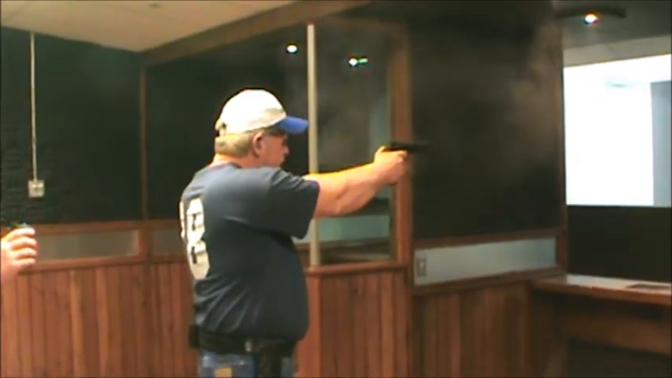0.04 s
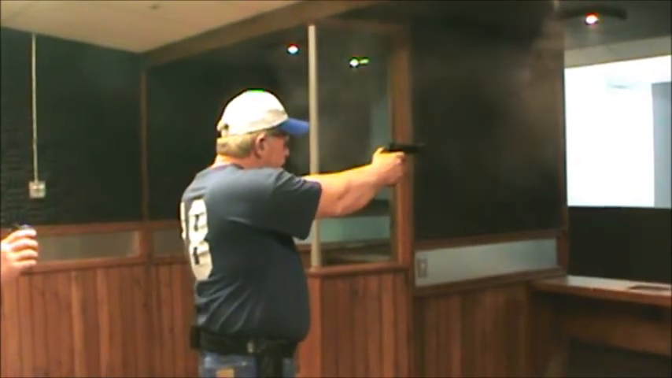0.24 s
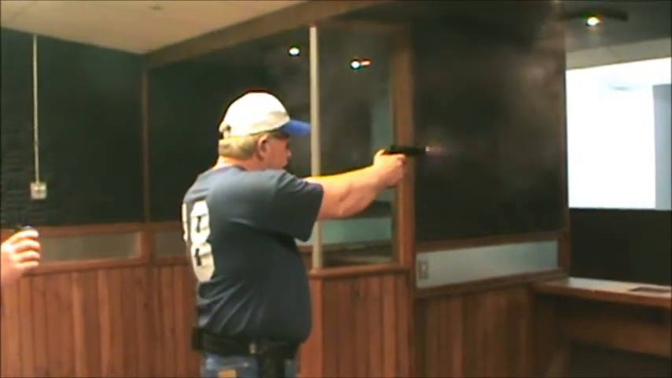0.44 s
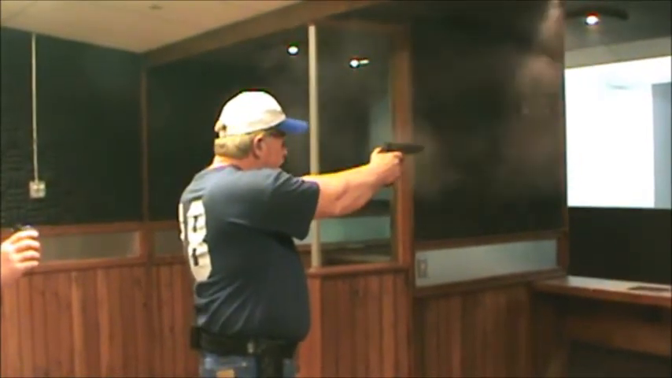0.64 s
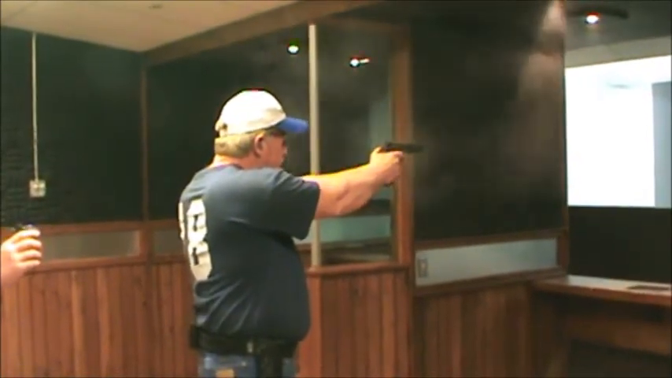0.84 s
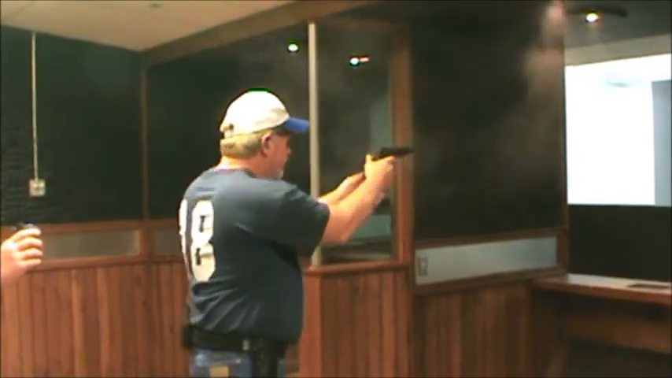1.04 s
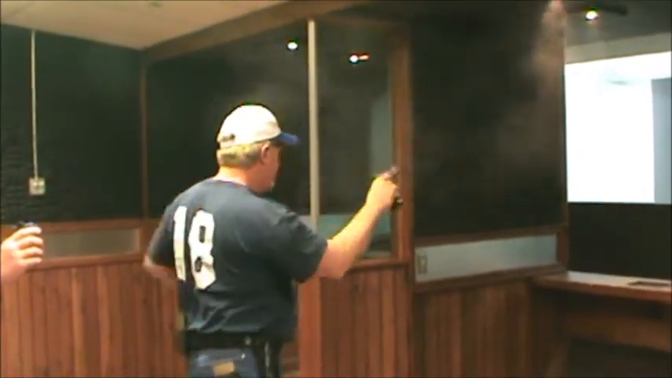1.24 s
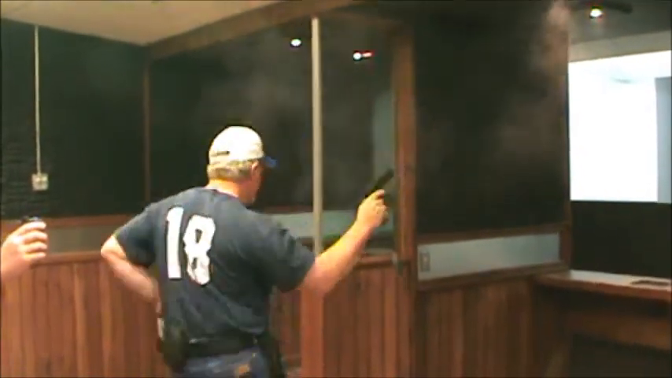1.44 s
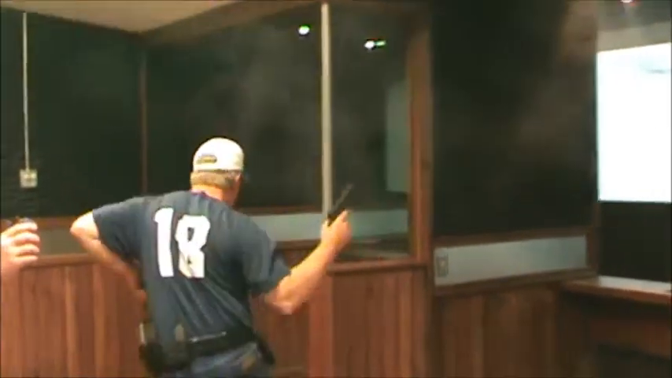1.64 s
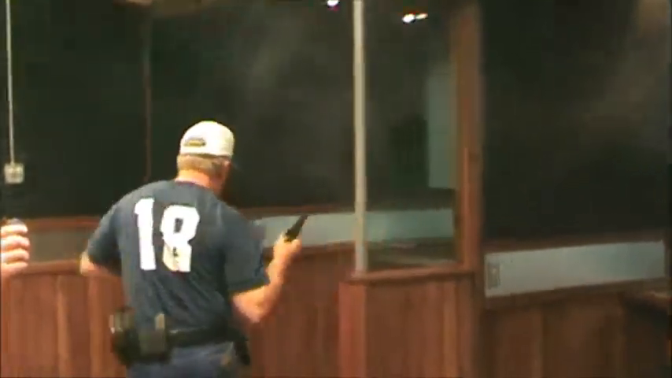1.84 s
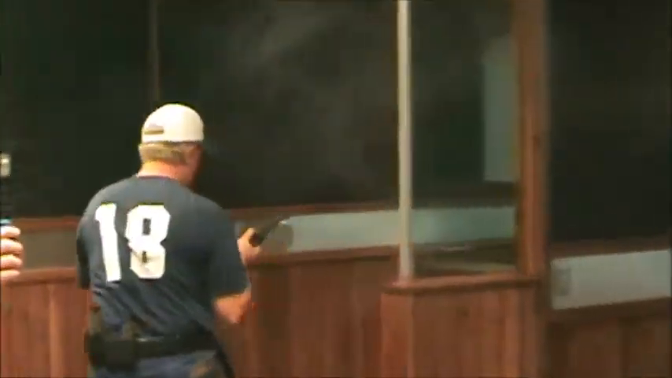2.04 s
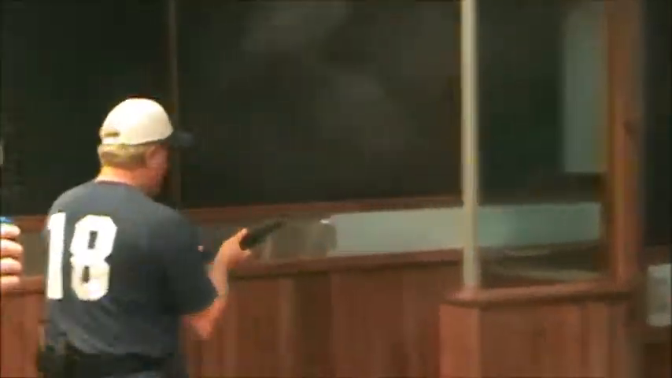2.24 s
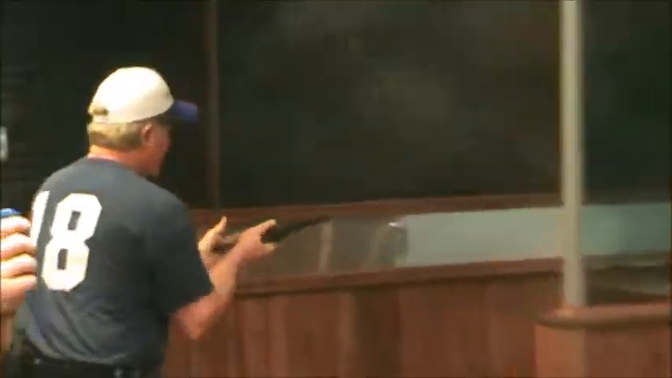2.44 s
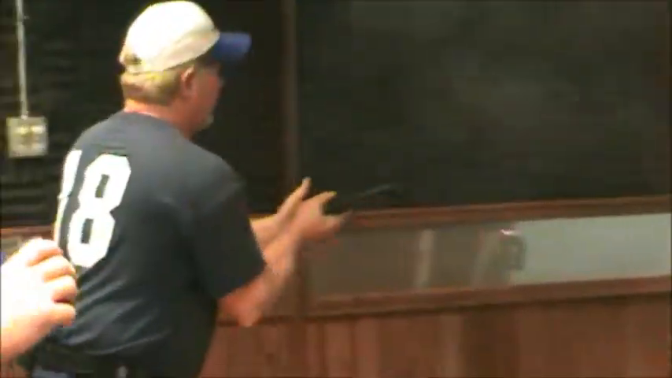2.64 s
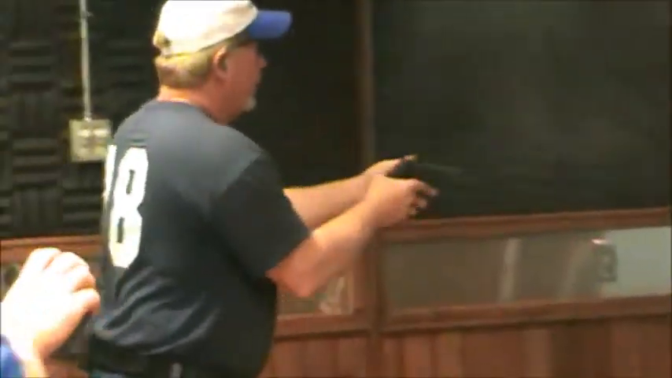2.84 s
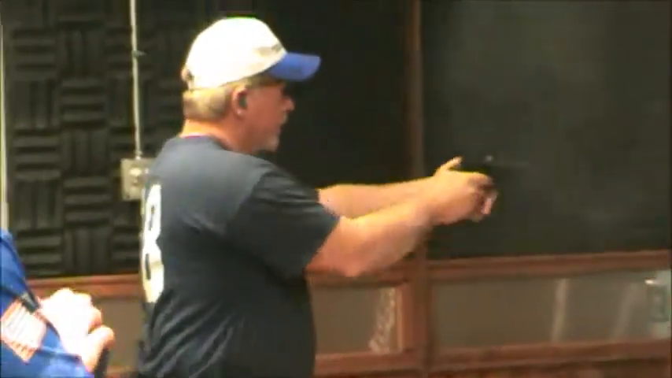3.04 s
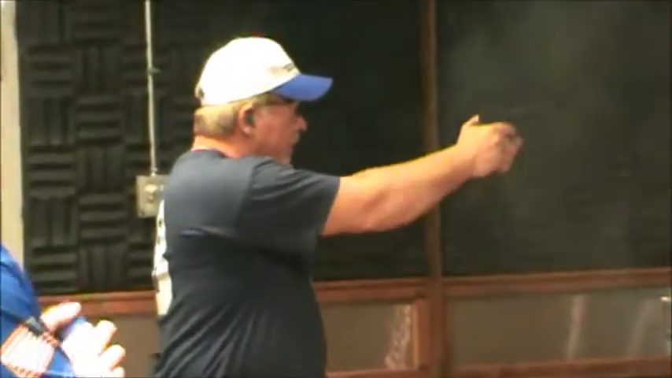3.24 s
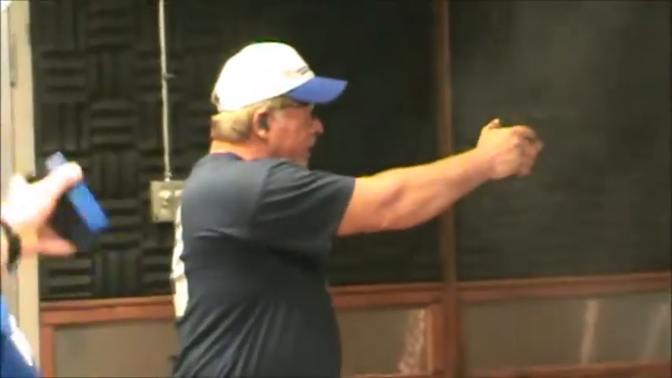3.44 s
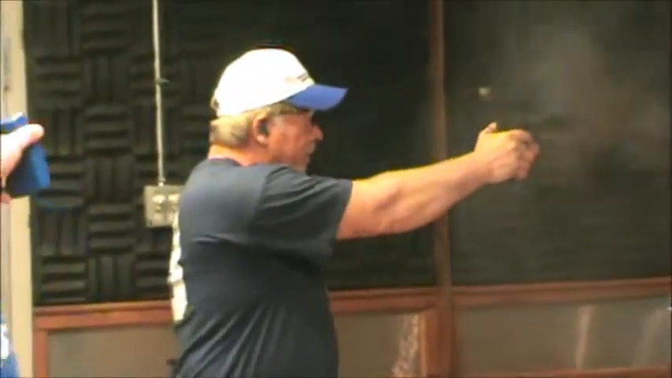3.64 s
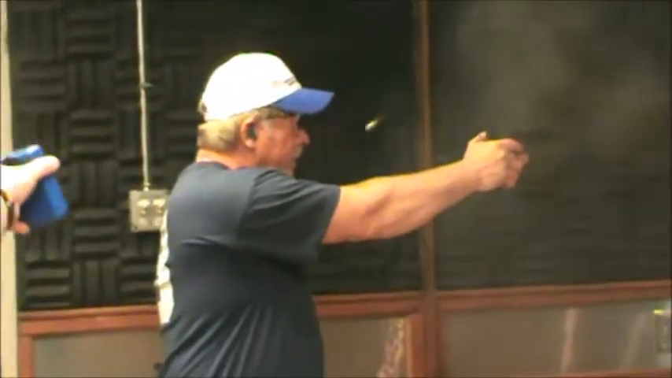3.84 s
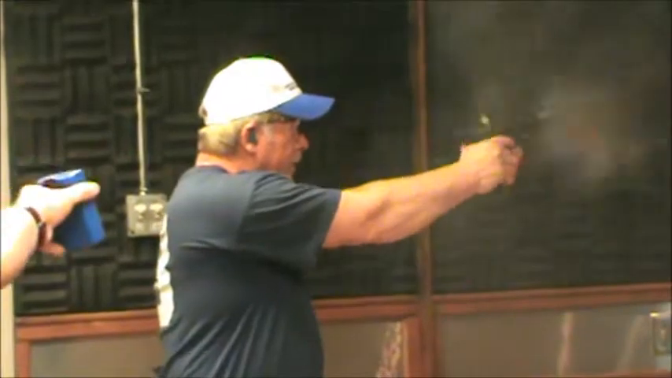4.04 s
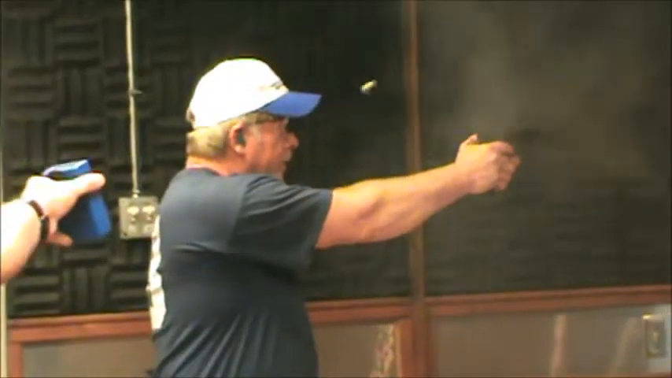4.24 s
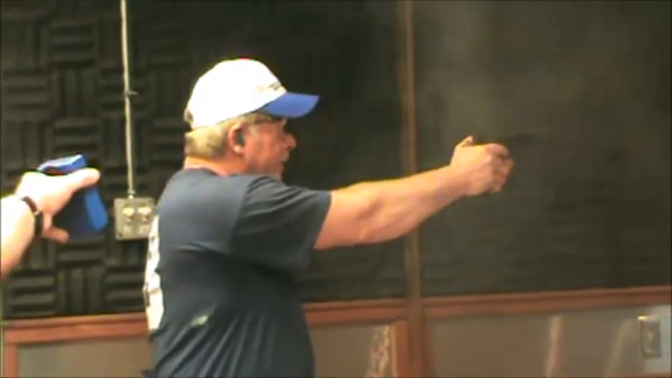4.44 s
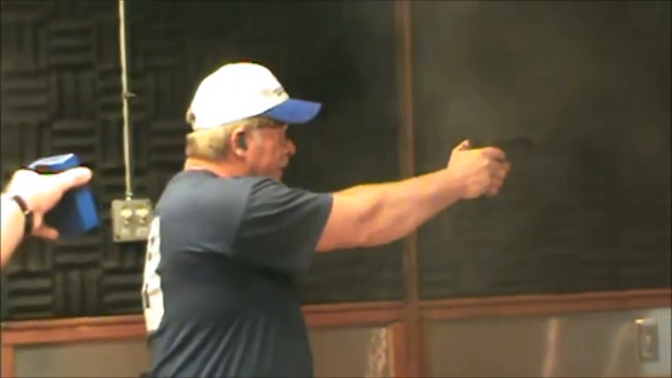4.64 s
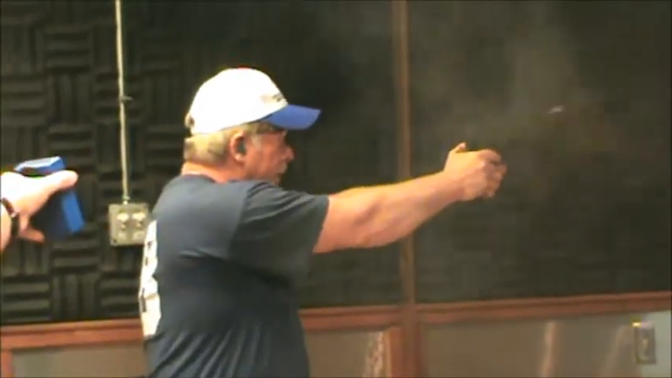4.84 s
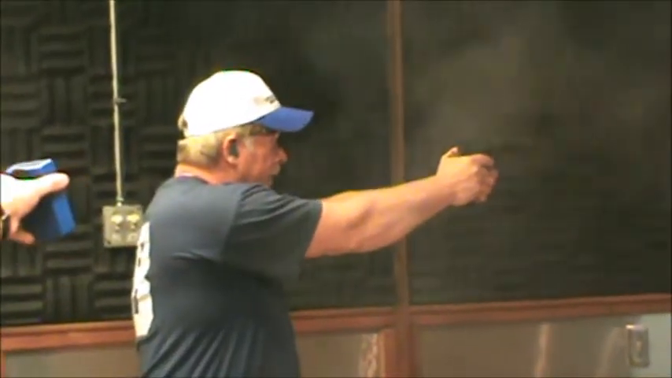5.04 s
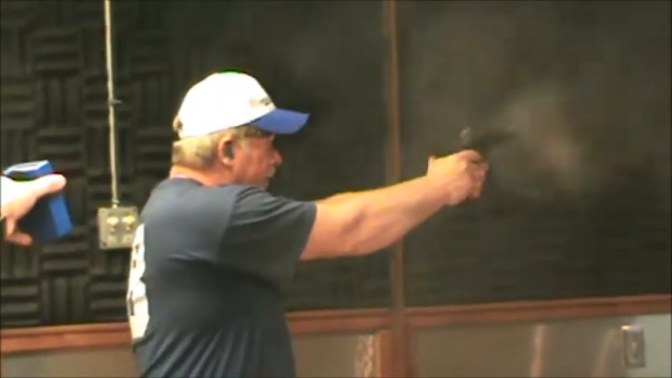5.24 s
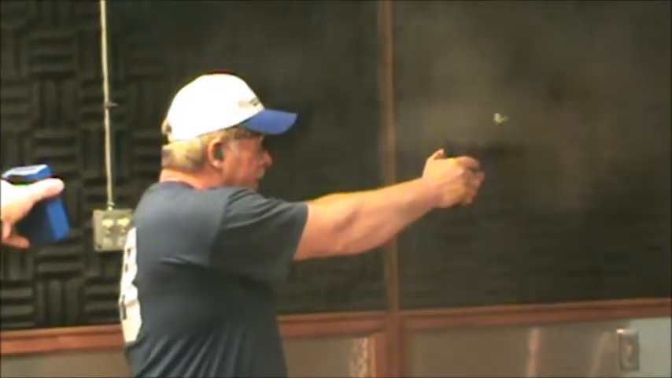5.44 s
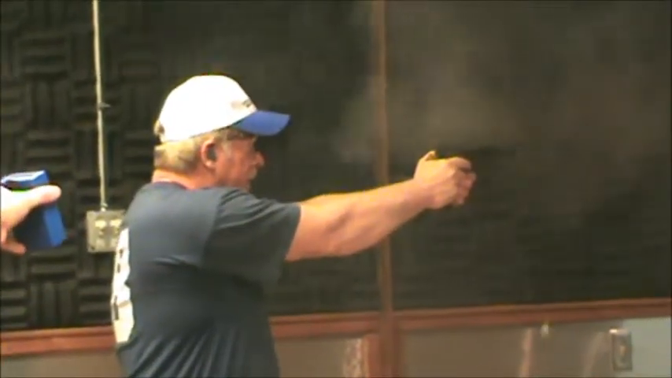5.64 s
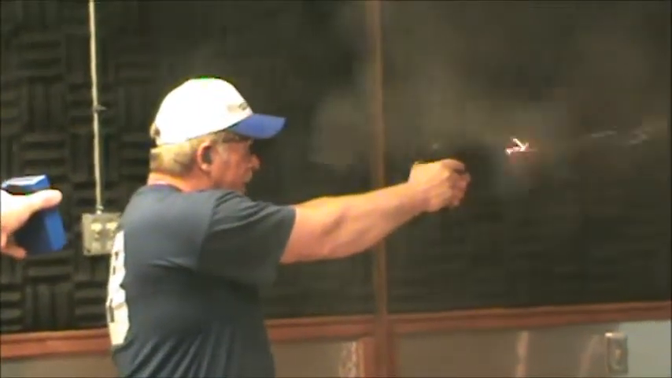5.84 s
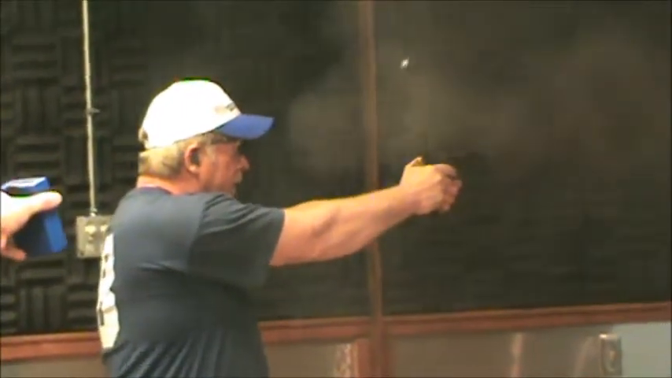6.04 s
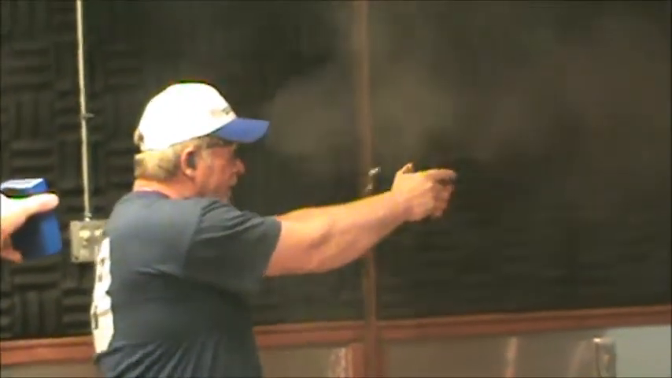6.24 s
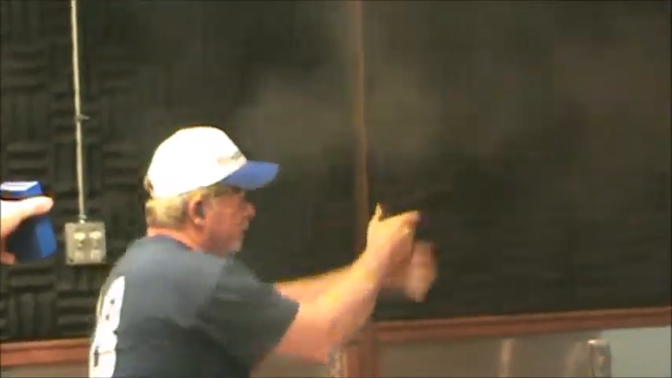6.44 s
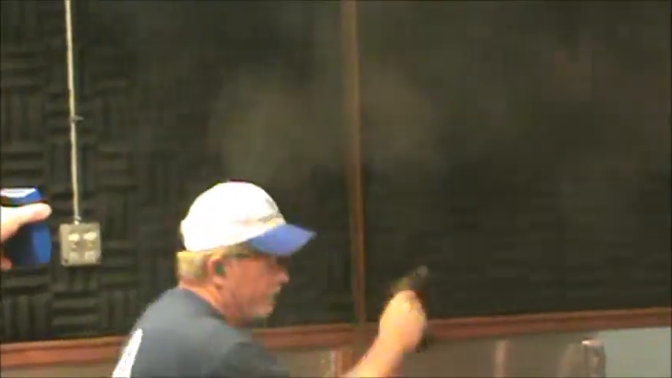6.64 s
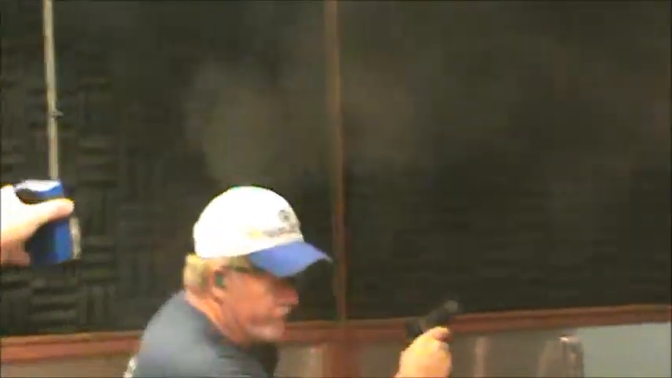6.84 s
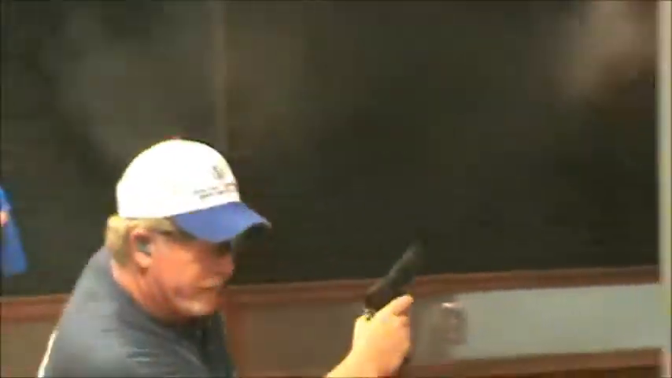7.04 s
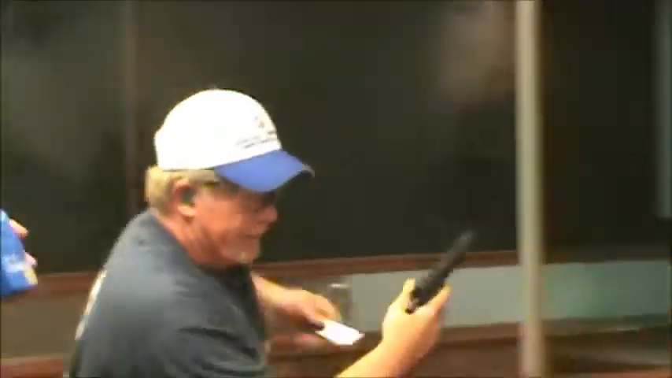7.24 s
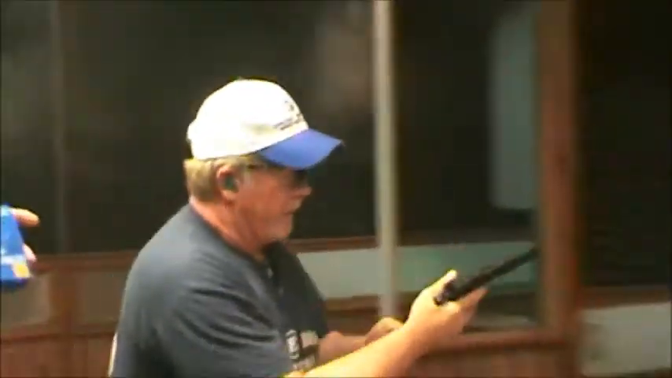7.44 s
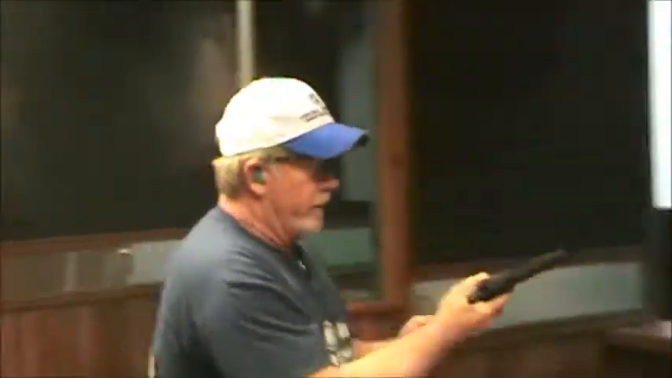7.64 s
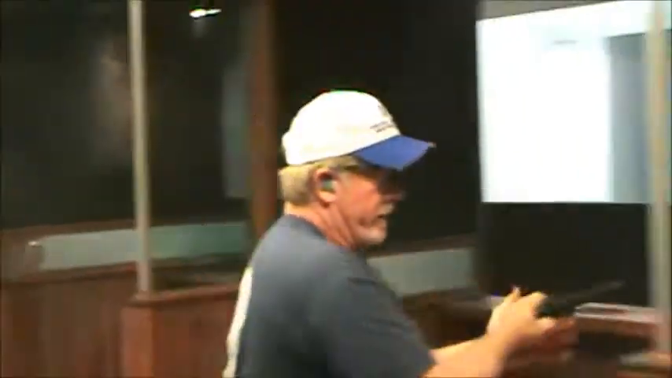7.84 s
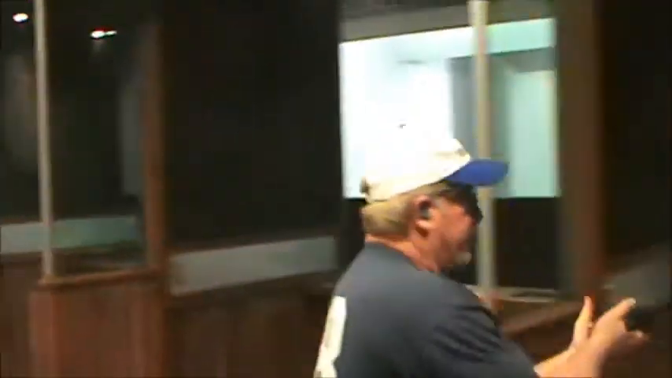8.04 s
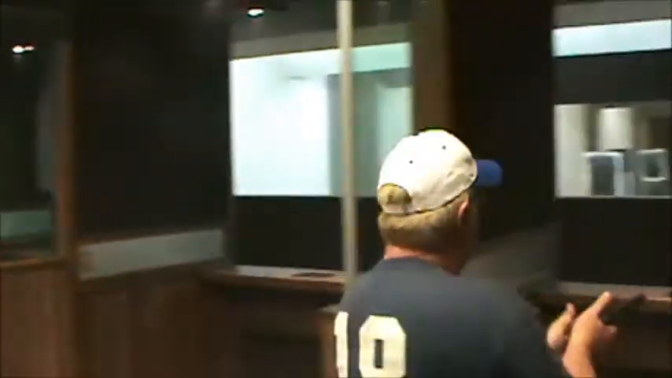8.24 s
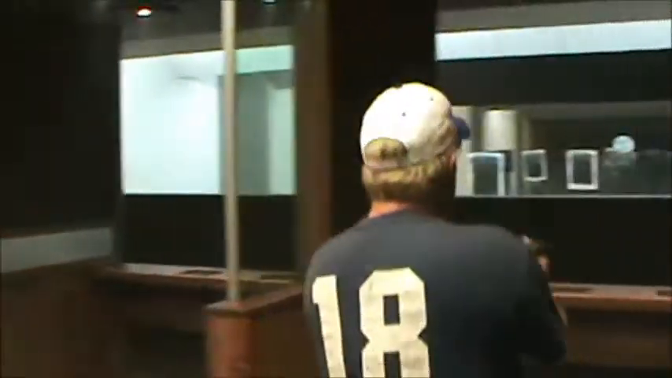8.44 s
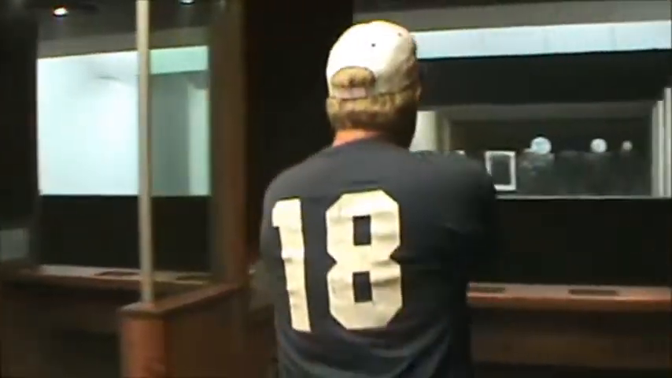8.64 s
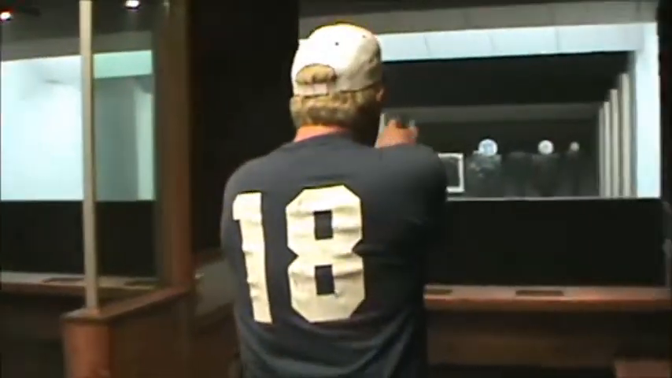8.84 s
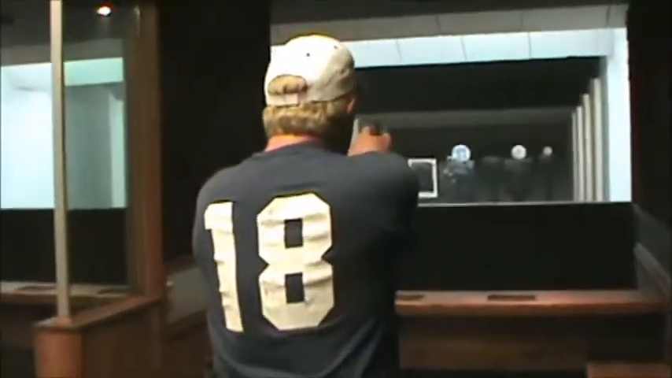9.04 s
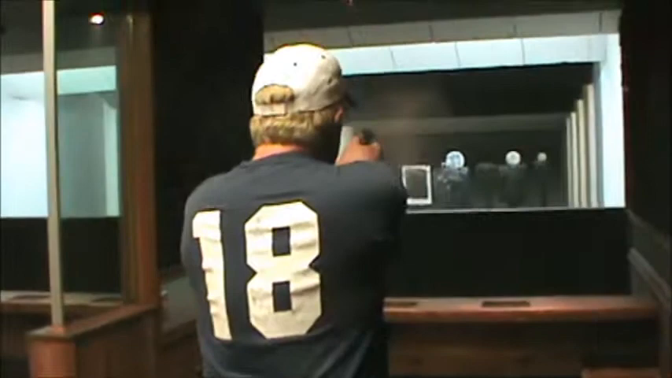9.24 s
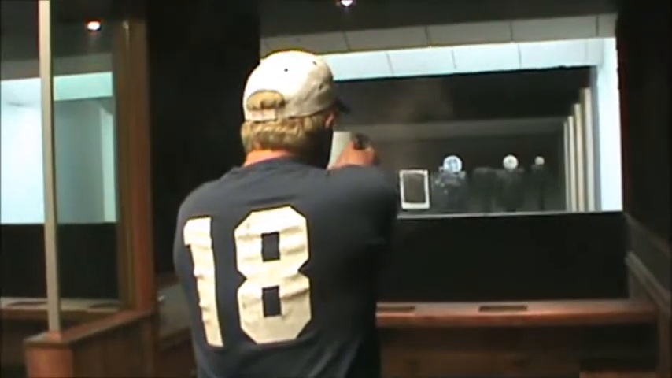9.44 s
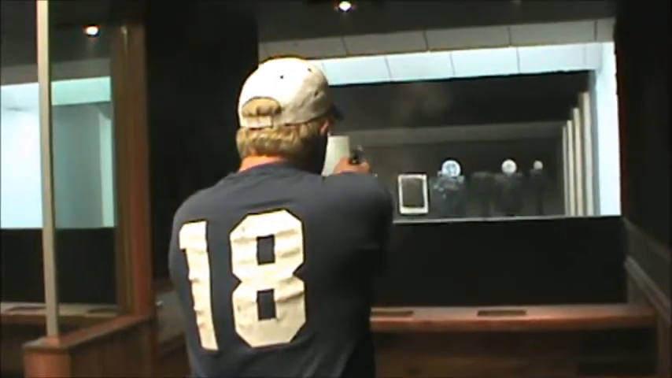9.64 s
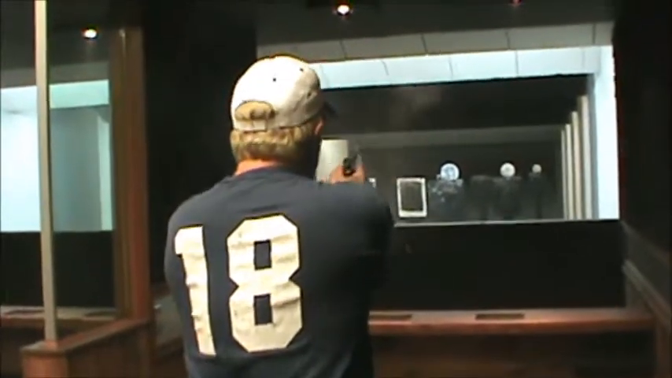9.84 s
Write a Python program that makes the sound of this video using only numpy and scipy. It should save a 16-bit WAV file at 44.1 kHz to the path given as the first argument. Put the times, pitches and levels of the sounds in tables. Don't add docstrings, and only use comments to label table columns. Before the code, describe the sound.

Loud handgun blasts at about 0.5, 3.6 to 5.9 and 9.1 seconds, ringing steel targets, tinkling brass and sharp reload clatter over ventilation rumble.

```python
import sys
import numpy as np
from scipy import signal
from scipy.fft import rfft, irfft, next_fast_len
from scipy.io import wavfile
from scipy.ndimage import uniform_filter1d, map_coordinates

SR = 44100
rng = np.random.default_rng(int(sys.argv[2]) if len(sys.argv) > 2 else 0)


def store_pcm(level_fs):
    pcm = np.round(np.clip(level_fs, -1, 1) * 32767).astype(np.int16)
    wavfile.write(sys.argv[1], SR, np.atleast_2d(pcm).T)


def rack_gain(trim_db):
    fader = np.asarray(trim_db, float)
    return 10 ** (fader / 20)


N = 436570

# start_s, far_end_delay_s, answer_db, answer_brightness_db, near_hall_db
SHOTS = [
    (-.2, 0.11, -29, 4.5, -46),
    (0.4715, 0.16, -20.5, 4, -15.5),
    (3.601, 0.16, -18.5, 5, -15),
    (4.048, .16, -18.5, 0.5, -15.5),
    (4.774, 0.13, -18, 6.5, -19.5),
    (5.2413, .124, -19.5, 4.5, -19),
    (5.8664, 0.15, -21, 1, -16.5),
    (9.085, 0.18, -15, 1.5, -14.5),
]
# frequency_hz, density_db_per_hz
ANSWER = [(35, -47), (60, -24), (262, -6.5), (301, -5), (400, -5.5), (520, -3), (698, -6.5), (924, -3.5),
          (3040, -5.5), (12100, -21), (14600, -34.5), (16000, -35)]
# frequency_hz, density_db_per_hz
BOOM = [(60, -28), (150, -10), (300, -6.5), (400, -7), (550, -2), (850, -6), (1500, -23), (4000, -69)]
# frequency_hz, t60_s
BAY = [(100, 0.49), (500, 0.39), (1500, 0.24), (5000, 0.24), (14000, 0.19)]
# frequency_hz, t60_s
HALL = [(100, 1.37), (500, 1.216), (2500, 1.45), (6000, 1.124), (14000, 0.71)]


def along(points, hz):
    f, v = np.transpose(points)
    return np.interp(np.log(hz + 1), np.log(f + 1), v)


def tone(points):
    return lambda f: rack_gain(along(points, f))


def room_decay(points, factor=1):
    return lambda f: factor * along(points, f)


def even_decay(t60):
    return lambda f: t60 + 0 * f


def balance(left_over_right_db):
    return rack_gain(left_over_right_db / 2 * np.array([[1], [-1]]))


def add(out, s, x):
    at = round(s * SR)
    x = x[:, max(-at, 0):N - at]
    out[:, max(at, 0):][:, :x.shape[1]] += x


def wobble(rate, size, channels=2):
    knots = rng.standard_normal((channels, int(size * rate / SR) + 4))
    coarse = np.arange(0, size + 128, 128)
    curves = [map_coordinates(k, [coarse * rate / SR]) for k in knots]
    return np.array([np.interp(np.arange(size), coarse, curve) for curve in curves])


def burst(colour, t60, size, rise, width=1, patchy_db=0):
    # frequency_hz, likeness_0_to_1
    likeness = [(60, 0.6), (180, 0.7), (550, 0.73), (1650, 0.65), (4970, 0.32), (15000, 0.57)]
    hz, t, z = signal.stft(rng.standard_normal((2, size)), SR, nperseg=256)
    if patchy_db:
        field = rng.standard_normal(z.shape[1:])
        field = uniform_filter1d(uniform_filter1d(field, size=2, axis=0), size=24, axis=1)
        z = z * rack_gain(patchy_db * field / field.std())
    z = z * rack_gain(-60 * t / t60(hz)[:, None])
    dying = signal.istft(z, SR, nperseg=256)[1][:, :size]

    hz = np.fft.rfftfreq(size, 1 / SR)
    turn = np.arccos(np.clip(along(likeness, hz), -1, 1)) / 2 * width
    gain = colour(hz) / np.sqrt(np.mean(colour(hz) ** 2))
    mid, side = irfft(rfft(dying) * (gain * [np.cos(turn), np.sin(turn)]), size)
    onset = 1 - np.exp(-np.arange(size) / SR / rise)
    close = np.clip(np.arange(size)[::-1] / 4096 - 1, 0, 1)
    return np.array([mid + side, mid - side]) * (onset * close)


def ring(hz, t60, swell, beat, steady, size):
    t = np.arange(size) / SR
    hall, own = wobble(beat, size), wobble(beat, size, channels=4)
    shared_swing = .55 * (hall[0] + 1j * hall[1])
    own_swing = .55 * (own[:2] + 1j * own[2:])
    wander = steady + np.sqrt(np.clip(1 - steady ** 2, 0, 1)) * (shared_swing + own_swing)
    wander = wander / (np.abs(wander) + .05) ** .25
    carrier = np.real(wander * np.exp(2j * np.pi * hz * t))
    return 0.89 * carrier * rack_gain(-60 * t / t60) * (1 - np.exp(-t / swell))


def shots():
    # frequency_hz, density_db_per_hz
    blast = [(35, -45), (60, -19.5), (566, -4), (749, -6), (1170, -5), (1950, -6), (2300, -11.5),
             (2900, -6.5), (3850, -12), (11000, -14), (16000, -22.5)]
    bass_back = [0, 0.5, 2.5, 6.5, -0.5, -1, 2.5, -1.5]
    patchy_db = 2.2
    out = np.zeros((2, N))
    for (s, delay, answer_db, bright_db, near_db), bass_db in zip(SHOTS, bass_back):
        add(out, s, rack_gain(1.0) * burst(tone(blast), room_decay(BAY), SR, rise=0.0008))

        boom_db = 1.5 + 0.46 * near_db
        boom_t60 = 0.37 - 0.0177 * bright_db
        if s > 8.5:
            boom_db, boom_t60 = boom_db + 1.5, boom_t60 * 1.28
        add(out, s, rack_gain(boom_db) * burst(tone(BOOM), even_decay(boom_t60), SR, rise=0.031))

        lingering = room_decay(HALL, 0.82 + 0.0623 * bright_db)
        near = burst(tone(blast), lingering, SR * 3 // 2, rise=0.023, patchy_db=patchy_db)
        add(out, s, rack_gain(near_db) * near)

        tilt = tone([(800, bass_db), (2000, 0), (10000, bright_db)])
        colour = lambda f: tone(ANSWER)(f) * tilt(f)
        answer = burst(colour, lingering, SR * 3 // 2, rise=0.0072, patchy_db=patchy_db)
        add(out, s + delay, rack_gain(answer_db) * answer)
    return out


def plates():
    # start_s, level_db, swell_s, overtones_db, lead_of_strong_modes_ratio
    strikes = [
        (-.08, 3.5, 0.058, 3.5, 1.1),
        (0.631, 2.5, 0.05, 2, 1.35),
        (3.659, 7.5, 0.018, 0.5, 0.85),
        (4.09, -7.5, 0.0083, 10.5, 0.54),
        (4.91, 14.5, 0.18, -1, 0.74),
        (5.366, 5, 0.04, 0, 1.22),
        (5.935, -0.5, 0.006, 5.5, 1),
    ]
    # pitch_spread_share, steady_part_0_to_1, left_over_right_db
    swings = [(.012, .6, -3), (.012, .6, -5), (.003, .85, 0), (.017, .3, -1), (.005, .6, 0), (.012, .5, -3),
              (.013, .5, -8)]
    lives = [0.99, .85, 0.89, 0.93, .65, .9, 1.08]
    # pitch_hz, level_db, t60_s
    plate_a = [(1582, -42, 2.06), (2467, -27, 1.36), (2479, -23, 1.36), (2954, -33, 1.48),
               (3076, -35, 1.61), (4570, -45, 2.19), (4944, -41, 1.45), (8087, -36, 1.1), (9026, -56, 2.4)]
    # pitch_hz, level_db, t60_s
    plate_b = [(1596, -31, 1.71), (2303, -24.5, 1.7), (3091, -24, 1.48), (3255, -28, 1.1),
               (4623, -31.5, 1.55), (4979, -34, 1.47), (5160, -35, 1.49), (7224, -36, 1.76),
               (7631, -31, 1.75), (8237, -31, 1.19), (9917, -35, 1.24), (9998, -35, 1.25),
               (10690, -39, 1.37), (13231, -47, 1.51)]
    # pitch_hz, level_db, t60_s, left_over_right_db
    plate_c = [(1703, -30, 2.8, 1), (1800, -34, 2.4, -4), (2041, -27, 2.4, 5), (2450, -35, 2.14, 0),
               (2889, -36, 2.4, -2), (3568, -32, 2.4, -1), (4082, -33, 2.4, -1), (4179, -36, 2.2, 1),
               (4247, -33, 2.12, -1), (4439, -30, 1.78, -4), (5783, -36, 2.4, 4), (6529, -37, 1.96, -5),
               (8508, -43, 1.02, 0), (8759, -42, .98, 0),
               (2773, -38, 2.4, -12), (5283, -40, 2.4, 4), (5708, -41, 2.4, 10), (6006, -40, 2.4, 9),
            (7516, -40, 1.62, -4), (7835, -44, 1.54, 6), (8280, -44, 1.11, -6), (10435, -48, .92, 0),
            (10841, -46, .8, 0)]
    # pitch_hz, level_db, t60_s
    plate_d = [(2494, -18.5, 1.9), (2897, -33, 1.4), (4680, -18, 1.5), (7116, -34, 1), (7691, -25, .9),
               (8296, -28, .9)]
    # pitch_hz, level_db, t60_s, left_over_right_db
    plate_e = [(1688, -29, 1.87, -3), (1694, -34, 1.87, 1), (1794, -37, 1.89, 2), (2028, -25, 2.4, -8),
               (2365, -35, 1.67, 0), (3003, -36, 2.4, -2), (4059, -31, 2.4, 1), (4159, -31, 1.8, 7),
               (4218, -35, 1.8, -3), (4421, -27, 1.6, -3), (6982, -35, 1.7, 2), (7213, -34, 1.7, 8),
               (7432, -34, 1.3, 8), (7793, -37, 1.1, 2)]
    # pitch_hz, level_db, t60_s
    plate_f = [(3012, -16, 1.71), (3172, -30, 1.63), (4500, -33, 1.71), (4846, -31, 1.47),
               (5031, -27, 1.32), (7106, -24, 1.12), (7188, -24, 1.11), (7500, -23, 1.02),
               (8033, -32, 1.14), (9728, -28, 0.81), (9818, -28, 0.81), (10391, -31, 0.83),
               (10595, -31, 0.83), (12552, -32, 0.68),
               (9217, -32, 0.89), (10477, -31, 0.83), (11617, -34, 0.83), (11725, -34, 0.83)]
    # pitch_hz, level_db, t60_s
    plate_g = [(2408, -16, 1.55), (4597, -23, 1.32), (8087, -36, .7)]

    struck = (plate_a, plate_b, plate_c, plate_d, plate_e, plate_f, plate_g)
    fired = np.array([shot[0] for shot in SHOTS] + [99])
    size = SR * 5 // 4
    out = np.zeros((2, N))
    for strike, swing, life, modes in zip(strikes, swings, lives, struck):
        s, db, swell, overtones_db, lead = strike
        spread, steady, pan_db = swing
        top_db = max(mode[1] for mode in modes)
        next_shot_s = fired[fired > s][0]
        ducked = rack_gain(-16 * (s + np.arange(size) / SR > next_shot_s))
        for hz, level_db, t60, *lean_db in modes:
            mode_db = db + top_db + lead * (level_db - top_db)
            mode_db += along([(3000, 0.0073), (9000, overtones_db)], hz)
            gain = rack_gain(mode_db) * balance(pan_db + sum(lean_db))
            add(out, s, gain * ducked * ring(hz, t60 * life, swell, spread * hz, steady, size))
    return out


def splashes():
    # start_s, rings_db, hiss_db, left_over_right_db
    impacts = [
        (.567, -30, -26, -2),
        (3.66, -22.5, -27, 0),
        (4.895, -25, -22.5, 0),
        (5.364, -26.5, -24, -2),
    ]
    # pitch_hz, level_db, t60_s
    short_modes = [
        [(9916, -14, 0.62), (12800, -10, 0.53), (13230, -9, 0.37), (13610, 0, 0.15), (14000, -18, 0.43),
         (14440, -7, 0.2)],
        [(8753, 1, 0.54), (9878, -3, 0.41), (10460, -16, 1.5), (10830, 0.5, 0.2397), (13260, -25, 4.2),
         (13610, -19, 0.47)],
        [(9485, -10.5, 0.49), (10790, -17.5, 0.79), (11670, -11, 0.34), (11980, 1, 0.23), (12700, -12, 0.34),
         (13010, -11, 0.29), (14320, -24, 0.84), (14920, -20, 0.18)],
        [(12350, 0, 0.5), (12620, -0.5, 0.48), (12750, -2.5, 0.36), (13700, -14, 1.3), (15110, 1, 0.45),
         (15710, -4, 0.23)],
    ]
    # frequency_hz, density_db_per_hz
    spray = [(1000, -24.5), (3000, -7.5), (7000, -6.5), (12000, 2), (16000, -3)]
    size = SR // 2
    out = np.zeros((2, N))
    for (s, db, hiss_db, pan_db), modes in zip(impacts, short_modes):
        rings = np.zeros((2, size))
        for hz, level_db, t60 in modes:
            rings += rack_gain(level_db) * ring(hz, min(t60, .6), swell=.004, beat=60, steady=.6, size=size)
        hiss = burst(tone(spray), even_decay(.3), size, rise=.001)
        add(out, s, balance(pan_db) * (rack_gain(db) * rings + rack_gain(hiss_db) * hiss))
    return out


def contacts():
    # start_s, peak_db, bay_echo_db
    snaps = [(0.303, -35.5, -3.5), (1.763, -13, 1), (2.018, -26, -5.5), (2.184, -27.5, -9.5),
             (2.262, -39.5, -11), (2.3298, -28.5, -8), (7.183, -14, -14.5), (7.2082, -12, -13),
             (7.709, -40, -0.5), (7.7158, -32.5, 1), (7.729, -32.5, -5.5)]
    # start_s, peak_db, bay_echo_db
    ticks = [(1.23, -47, -2), (1.267, -34, -2.5), (1.507, -42.5, -1), (2.0888, -35, 2.5),
             (2.3794, -32, -4.5), (2.4259, -37.5, 0.5), (2.503, -35, -2), (2.515, -16, -8),
             (2.727, -31.5, -5), (7.5055, -36.5, -6.5)]
    # start_s, peak_db, bay_echo_db
    pings = [(2.763, -30.5, -8), (3.5257, -28.5, -4), (3.029, -48, -13), (6.5877, -42, -1.5),
             (6.674, -26.5, -13.5), (6.7329, -36, -6), (6.809, -43.5, 0), (7.122, -43.5, -5),
             (7.128, -44.5, -4), (7.844, -29.5, 3.5), (7.858, -14.5, -14), (9.537, -18, -6)]
    # start_s, peak_db, bay_echo_db
    thuds = [(7.4386, -34.5, -2), (7.5223, -34, -0.5), (7.62, -41, -2), (9.635, -43, -9.5)]
    # start_s, peak_db, bay_echo_db
    clacks = [(0.179, -40, -10), (6.03, -20.5, -2), (6.4497, -48, 4.5), (7.363, -23.5, -6),
              (7.989, -31.5, -8), (7.996, -24.5, -8.5), (8.959, -46, -11), (9.8333, -23.5, -9)]
    # low_db, middle_db, high_db
    snap_tone = (-38, -4, -1)
    tick_tone = (-24, -6, -7.5)
    ping_tone = (-34, -10, -8)
    thud_tone = (7.4, -16, -8)
    clack_tone = (4.5, 9.5, -13.5)
    # delay_s, level_db
    near_walls = [(0.0192, -7), (0.03, -9)]

    kinds = ((snap_tone, snaps), (tick_tone, ticks), (ping_tone, pings), (thud_tone, thuds), (clack_tone, clacks))
    spike = .8 + .7 * rack_gain(-60 * np.arange(SR // 4) / SR / .006)
    out = np.zeros((2, N))
    for (low_db, mid_db, high_db), rows in kinds:
        colour = tone([(100, low_db - 5.5), (700, low_db + 4.0), (2000, mid_db + 5.5), (3800, mid_db / 2),
                       (6000, 0), (11000, high_db + 6.0), (16000, high_db - 4)])
        band_db = 10 * np.log10(np.mean(colour(np.linspace(0, SR / 2, 129)) ** 2)) + 5.6
        for s, db, echo_db in rows:
            tick = lambda: burst(colour, even_decay(0.034), SR // 4, rise=0.0001, width=0.7)
            tick_db = db + band_db - 5
            add(out, s, spike * rack_gain(tick_db) * tick())
            for delay, wall_db in near_walls:
                add(out, s + delay, rack_gain(wall_db + echo_db + 3 + tick_db) * tick())
            bay = burst(colour, room_decay(BAY, 0.94), SR // 3, rise=0.0064)
            add(out, s, rack_gain(db + band_db - 4.5 + echo_db) * bay)
    return out


def slams():
    # start_s, level_db, tail_db, hall_decay_factor
    blows = [
        (3.239, -11.5, -21.5, 0.99),
        (7.184, -16.5, -27.5, 1),
    ]
    # frequency_hz, density_db_per_hz
    dull = [(35, -55), (60, -16), (698, -5.5), (882, -5), (1060, -10), (1740, -4), (1950, -9),
            (10800, -18.5), (16000, -37)]
    # frequency_hz, density_db_per_hz
    bright = [(35, -45), (60, -9), (250, -14), (437, -9.5), (1470, -3.5), (1910, 0), (3670, -6.5),
              (11500, -9), (16000, -20)]
    out = np.zeros((2, N))
    for (s, db, tail_db, slow), points in zip(blows, (dull, bright)):
        add(out, s, rack_gain(db) * burst(tone(points), room_decay(BAY, 1.62), SR // 2, rise=0.00083))
        add(out, s, rack_gain(tail_db - 6) * burst(tone(BOOM), even_decay(1.3), SR, rise=0.016))
        add(out, s, rack_gain(tail_db) * burst(tone(ANSWER), room_decay(HALL, slow), SR, rise=0.15))
    return out


def magazine():
    # start_s, level_db, corner_sharpness_db_per_octave
    bounces = [
        (1.744, -66, 31),
        (1.762, -35, 0),
        (2.018, -34, 1),
        (2.183, -30, -0.5),
        (2.261, -43, -10),
        (2.330, -32.5, -11),
    ]
    # pitch_hz, width_hz, level_db
    shell = [(1600, 160, -12), (1930, 220, -1), (2890, 450, -7), (4080, 600, -9.5)]
    out = np.zeros((2, N))
    for s, db, sharp_db in bounces:
        for hz, width_hz, mode_db in shell:
            resonance = lambda f: 1 / (1 + (2 * (f - hz) / width_hz) ** 2)
            corner_db = sharp_db * np.log2(hz / shell[1][0])
            body = burst(resonance, even_decay(0.18), SR // 2, rise=.001, width=0.54)
            add(out, s, rack_gain(db + mode_db + corner_db) * body)
    return out


def knocks():
    # start_s, pitch_hz, width_hz, level_db, t60_s
    broad_hits = [(1.507, 2160, 4000, -34, 0.26), (3.243, 400, 236, -23, 0.99),
                  (1.163, 10500, 5000, -46, 0.11), (2.8, 460, 500, -47, 0.34), (2.39, 420, 500, -47, .5),
                  (7.8, 600, 1200, -46, .5), (8.955, 3400, 1500, -50, .1), (8.335, 950, 200, -51, .1),
                  (7.19, 10000, 9000, -34, .55), (3.245, 9000, 9000, -33, .6), (7.364, 9000, 8000, -37, .2),
                  (6.462, 11500, 2000, -53, .15), (7.3, 340, 260, -36.5, 0.84),
                  (2.515, 1160, 1200, -38, 0.069), (2.515, 4070, 300, -33, 0.087),
                  (2.727, 3100, 400, -48, 0.084), (2.745, 2520, 300, -53, 0.15),
                  (7.364, 4000, 900, -33, 0.15), (7.525, 3700, 2500, -40.5, .1), (9.2, 680, 680, -20.5, .3),
                  (6.465, 1700, 1600, -36, 0.13), (6.615, 1240, 1100, -40.5, 0.1),
                  (7.193, 580, 570, -23.5, 0.43), (9.3, 480, 730, -43, 0.43), (7.995, 380, 460, -37, 0.24),
                  (7.7, 1960, 380, -42, 0.26), (7.363, 1440, 1260, -20.5, 0.2),
                  (1.765, 1970, 160, -30.5, 0.33), (7.71, 2800, 1500, -36, 0.2),
                  (7.858, 2870, 1100, -28, 0.15), (9.25, 2500, 3000, -16, 0.047),
                  (8.25, 790, 260, -44, 0.22), (9.834, 2160, 450, -28, 0.17)]
    out = np.zeros((2, N))
    for s, hz, width_hz, db, t60 in broad_hits:
        resonance = lambda f: 1 / (1 + (2 * (f - hz) / width_hz) ** 4)
        add(out, s, rack_gain(db) * burst(resonance, even_decay(t60), SR // 2, rise=0.00049, width=0.5))
    return out


def brass():
    # start_s, pitch_hz, overtone_hz, level_db, t60_s
    rolling = [(.31, 7300, 11600, -43, 1.2), (1.22, 7550, 11310, -46.5, 4.5),
               (1.96, 7600, 11200, -55, 0.37), (3.527, 9700, 10300, -29, 0.089),
               (6.505, 7420, 11800, -45, 0.47), (6.865, 7230, 11900, -53, 11),
               (7.121, 7500, 11500, -44.5, 0.75), (9.835, 7400, 11650, -42, 0.68)]
    # start_s,
    # pitch_hz, level_db, t60_s
    single_rings = [(2.27, 7600, -58, .33), (1.37, 11300, -52.5, 2), (6.92, 7280, -50.5, 3),
                    (2.517, 8200, -38, 0.66), (6.68, 7650, -49, 0.94), (7.6, 7560, -43, 1.5),
                    (7.66, 11300, -58, 0.65), (8.491, 7620, -51, .4)]
    # pitch_hz, level_db, t60_s
    early_overtones = [(7500, -20, 0.84), (7940, -21, 0.6), (9900, -22.5, 0.54), (10800, -24, 0.71)]
    rings = [(.57, *mode) for mode in early_overtones] + single_rings
    for s, hz, upper_hz, db, t60 in rolling:
        rings += [(s, hz, db, t60), (s, upper_hz, db - 9, t60 * 0.82)]
    size = SR * 3 // 5
    fade = np.hanning(SR * 6 // 5)[size:]
    out = np.zeros((2, N))
    for s, hz, db, t60 in rings:
        add(out, s, rack_gain(db) * ring(hz, t60, swell=0.0021, beat=150, steady=.3, size=size) * fade)
    return out


def air():
    # time_s, level_db
    rumble_level = [(0, -52), (.45, -50.5), (.6, -52), (1.5, -51), (2.3, -45), (3.2, -44), (3.7, -47.5),
                    (4.5, -50.5), (5.5, -51.5), (6.3, -52), (7, -54.5), (7.6, -42.5), (8.2, -45.5),
                    (8.8, -41), (9.2, -43), (9.9, -46)]
    # frequency_hz, density_db_per_hz
    duct = [(15, -33), (28, -12), (42, 3.5), (62, -8.5), (90, -10.5), (130, -26), (250, -64.5)]
    # frequency_hz, density_db_per_hz
    fans = [(60, -21.5), (120, -3), (170, 11), (240, 0.5), (1000, -2.5), (3500, -11), (5500, -18.5),
            (8000, -22.5), (12000, -24.5), (16000, -35)]
    # time_s, level_db
    motor = [(0, -70), (2.6, -67), (2.95, -62), (3.2, -61), (3.5, -70), (7.9, -73), (8.2, -68), (8.7, -70),
             (9, -62), (9.9, -68)]
    # time_s, level_db, half_length_s
    clothing = [
        (8.326, -62.5, 0.096),
        (8.928, -58.5, .11),
    ]
    t = np.arange(N) / SR

    def noise(points, width):
        return burst(tone(points), even_decay(1e6), next_fast_len(N + 8192), .01, width)[:, :N]

    rumble_db = np.interp(t, *np.transpose(rumble_level))
    rumble = rack_gain(rumble_db + 2.1 * wobble(5, N, channels=1)) * noise(duct, width=1.05)

    hiss_db = -52.5 + 0.33 * (rumble_db - rumble_db.mean())
    hiss = rack_gain(hiss_db) * noise(fans, width=0.49)

    whine_db = np.interp(t, *np.transpose(motor)) + 1.5 * wobble(7, N, channels=1)
    whine = rack_gain(whine_db) * np.sin(2 * np.pi * 4050 * t + .6 * wobble(20, N, channels=1))

    strokes = sum(rack_gain(db - 13 * ((t - s) / half) ** 2) for s, db, half in clothing)
    cloth = noise([(1500, -20.0), (5000, -6), (10500, -6.5), (16000, -13.0)], width=1.4)
    rustle = strokes * rack_gain(0.89 * wobble(60, N, channels=1)) * cloth
    return rumble + hiss + whine + rustle


def scene():
    gunfire = shots() + plates() + splashes()
    handling = contacts() + slams() + magazine() + knocks() + brass()
    return gunfire + handling + air()


def low_pass(x):
    return signal.sosfilt(signal.butter(12, 15700, fs=SR, output="sos"), x)


def record(dry):
    power = uniform_filter1d(np.mean(dry ** 2, axis=0), size=177)
    loudness = np.sqrt(np.abs(power))
    held = dry / (0.5 + (loudness / 0.52) ** 4.84) ** (1 / 4.46)
    rounded = held / (1 + np.abs(held / 0.78) ** 4.9) ** (1 / 8.2)
    return low_pass(rounded)


dry = scene()
out = record(dry)
store_pcm(out)
```